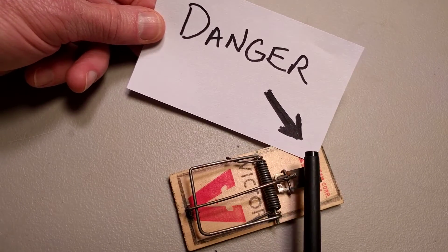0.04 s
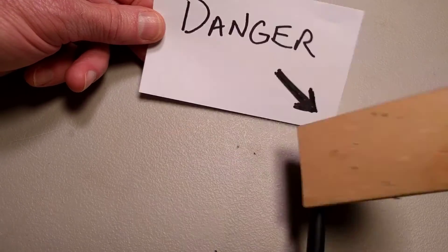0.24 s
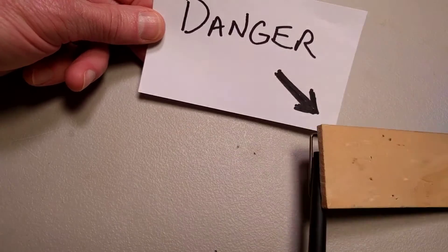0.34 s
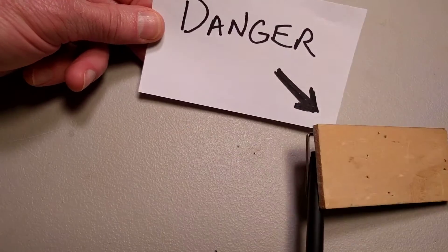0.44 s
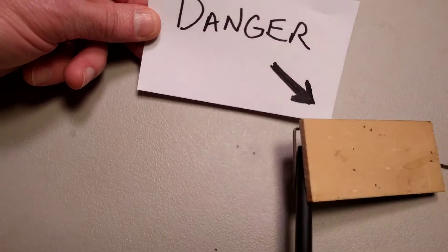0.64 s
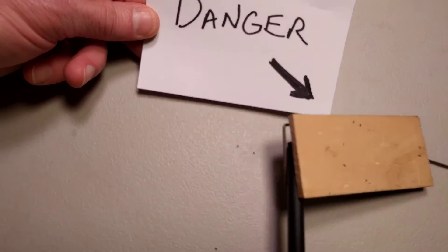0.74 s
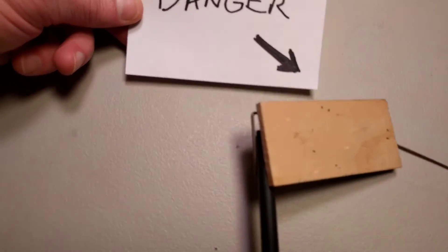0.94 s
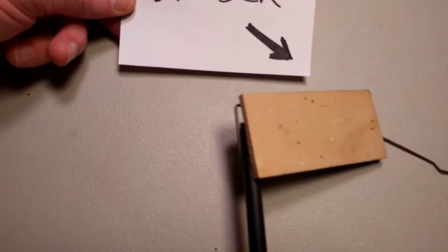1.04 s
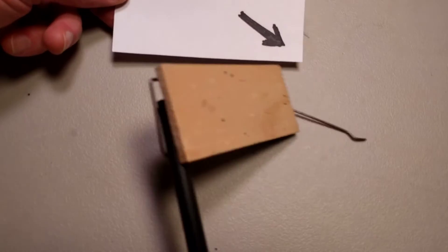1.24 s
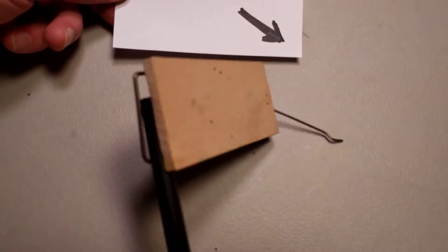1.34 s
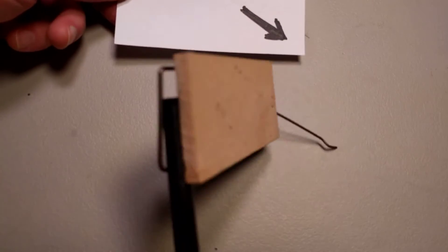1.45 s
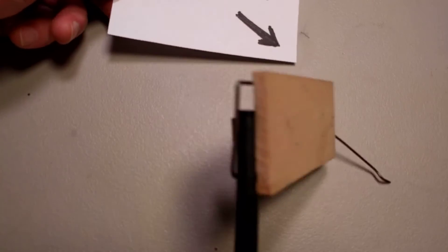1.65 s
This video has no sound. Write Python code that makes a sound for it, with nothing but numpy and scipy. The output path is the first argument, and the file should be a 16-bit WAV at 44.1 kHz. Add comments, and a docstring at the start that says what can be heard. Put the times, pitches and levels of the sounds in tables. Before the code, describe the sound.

After near silence, a piercing, slightly overloaded snap of a spring mousetrap, a second hard knock as it lands, small wiry rattles, then much softer wood scraping and creaking over a table in a quiet room, close up.

```python
"""Near-silence first; at 0.1 s low room noise and hiss come up at once. At 0.2 s a wooden mousetrap snaps
shut on a stick close to the microphone, jumps and clatters back onto a table. The board is then dragged
over the table top: it scrapes, sticks and slips in a short creak, and scrapes again. Noise bursts ring the
modes of board and wire; grainy noise makes the scrape; decaying sines ring the table; filtered noise is the hush."""
import sys
import numpy as np
from scipy import signal
from scipy.fft import rfft, irfft
from scipy.io import wavfile
from scipy.ndimage import uniform_filter1d

SR = 44100
rng = np.random.default_rng(int(sys.argv[2]) if len(sys.argv) > 2 else 0)


def field_ratio(decibels):
    """Amplitude ratio for a level in dB (20 dB per decade); scalars and array-likes work."""
    return 10 ** (np.asarray(decibels, dtype=float) / 20)


def digitize_waveform(pressure):
    """Quantize a signal to 16-bit integers and store it at the path in sys.argv[1].

    Rows of a 2-D input are taken as channels; values are limited to [-1, 1].
    """
    field = np.atleast_2d(pressure).T
    bounded = np.clip(field, -1, 1)
    quanta = np.round(bounded * 32767).astype(np.int16)
    wavfile.write(sys.argv[1], SR, quanta)


N = 74970  # samples, 1.7 s
LANDED_S = 0.76  # from here on the board rings as it does while dragged


def snap_and_clatter():
    """Separate blows of the trap: the snap, the jump, the landing and later knocks of the dragged board."""
    # blows: t/s, level/dB (loudest 2 ms), contact decay/ms, favoured f/Hz, spread to each side/octaves
    blows = [(0.128, -55, 3.1, 1500, 2.5), (0.2056, -28.5, 8.8, 301, 2.15),
             (0.2119, -20.5, 2.9, 6860, 0.42), (0.2143, -19, 4.6, 5000, 2.7), (0.2165, -3, 1.8, 5030, 0.86),
             (.219, 5, 4.9, 3470, 1.74), (0.2255, -6, 2, 3150, 0.94), (0.231, -9, 6.4, 6540, 0.34),
             (.2362, -17, 1.7, 7300, 0.18), (.249, -14, 2.7, 6000, 0.35), (.260, -15.5, 4.1, 6920, 0.45),
             (0.285, -22, 3.1, 5950, 0.37), (0.344, -12.5, 2.3, 7300, 0.15), (0.3888, -18, 2.7, 9000, 1.1),
             (0.389, -22, 1.1, 2280, 0.11), (0.408, 1, 1.43, 4480, 2.5), (0.4102, -3, 1.63, 5000, 1.82),
             (0.4095, -4.5, 2.1, 2905, 0.25), (0.4267, -30, 1.8, 4870, 1.8),
             (0.4644, -11.5, 0.95, 5800, 1.14), (0.4645, -20.5, 2.7, 2510, 0.14),
             (.468, -16, 1.8, 6050, 0.23), (0.5547, -13, 1.34, 6400, 0.6), (0.559, -18.5, 1.6, 5740, 0.25),
             (0.584, -20.5, 2.2, 6400, 0.22), (0.408, -12, 1.3, 600, 0.91), (.2205, -9, 7, 860, 1.26),
             (0.885, -38, 11, 5810, 0.52), (1.2165, -39.5, 3.7, 11500, 0.56), (1.234, -45, 13, 13000, 0.37),
             (1.2497, -37, 3., 8830, 0.069), (1.318, -34.5, 8, 5800, 0.77), (1.645, -36.5, 30, 7400, 0.15)]
    out = np.zeros(N)
    for s, db, contact_ms, hz, octaves in blows:
        add(out, s, blow(db, contact_ms, hz, octaves, s > LANDED_S))
    return out


def blow(db, contact_ms, favoured_hz, octaves, dragged):
    """A hard first touch and a dying burst of contact noise ring the modes near the favoured pitch most."""
    first_touch = 5.1  # times the rms of the contact noise at its start
    t = np.arange(3000) / SR
    push = rng.standard_normal(len(t)) - first_touch * (t == 0)
    push *= np.exp(-t * 1000 / contact_ms)
    favoured = band(push, favoured_hz / 2 ** octaves, favoured_hz * 2 ** octaves, order=2)
    rung = body(favoured, dragged)
    loudest = np.sqrt(uniform_filter1d(rung ** 2, 88).max())  # rms over 2 ms
    return field_ratio(db) * rung / loudest


def creak():
    """Stick and slip of the dragged board: each slip rings it, knocks it lower down and ticks."""
    # slips: t/s, level/dB (loudest 2 ms of the ring), favoured f/Hz
    slips = [(0.795, -44.5, 6000), (0.891, -36, 5950), (.977, -41, 5700), (1.0029, -39.5, 6000),
             (1.11, -38.5, 2500), (1.117, -41, 2400), (1.144, -36.5, 2520), (1.154, -30, 2570),
             (1.162, -26.5, 2400), (1.1744, -28.5, 2540), (1.1888, -25, 2500), (1.1999, -23, 3030),
             (1.2146, -29, 2400), (1.2313, -31, 3020), (1.2427, -37, 4300), (1.2497, -34.5, 5000),
             (1.2544, -32, 6540), (1.2616, -38.5, 5000), (1.287, -39.5, 4950), (1.6718, -27.5, 7100)]
    knock_db, tick_db = -11, -2.5  # against the ring of the slip
    out = np.zeros(N)
    for s, db, hz in slips:
        ring = blow(db, 0.75, hz, 0.27, True)
        knock = blow(db + knock_db, 2.5, 600, 0.63, True)
        tick = blow(db + tick_db, 0.13, 4300, 0.6, True)
        add(out, s, ring + knock + tick)
    return out


def body(push, dragged):
    """Passes a push through board and wire."""
    return signal.oaconvolve(push, body_taps(dragged))[:len(push)]


def body_taps(dragged):
    """Causal (minimum-phase) response whose power is the sum of the modes' powers."""
    # modes of board and wire: f/Hz, width/Hz, level while jumping/dB, level while dragged/dB
    modes = [(135, 96, 4, 2.5), (253.4, 186, 5, 7.5), (520, 145, 2.5, 6.5), (803, 137, 2, 2),
             (984, 48, 3.5, 4), (1550, 2200, -7.5, -16), (2221, 225, -2, -1.5), (2510, 95, 1, 0),
             (3203, 160, 0, -3.5), (3747, 200, 1.5, 0.5), (4127, 300, -4.5, 3.5), (4620, 330, -4, -4.5),
             (5294, 620, -0.5, -3.5), (5767, 240, 1, -1), (6400, 720, 1, -1), (6534, 130, -4, 2),
             (7300, 380, -1, -12), (7730, 260, -10, -13.5), (8700, 600, -15.5, -13.5),
             (9960, 1000, -15, -22), (13400, 1800, -15.5, -23), (14900, 520, -15, -22.5)]
    hz = abs(np.fft.fftfreq(8192, 1 / SR))
    power = sum(field_ratio(db[int(dragged)]) ** 2 / (1 + (2 * (hz - f) / width) ** 2) for f, width, *db in modes)
    log_gain = 0.5 * np.log(power)
    phase = -signal.hilbert(log_gain).imag
    return np.fft.ifft(np.exp(log_gain + 1j * phase)).real[:2048]


def rubbing():
    """Uneven grains of contact shake the modes, register by register, and the hollow under the dragged board."""
    # rubbing and rattling: t/s, low level/dB, middle level/dB, upper level/dB, treble level/dB
    levels = [(0.227, -18, -15.5, -5.5, -7.5), (0.268, -47, -47, -55, -26), (0.31, -39, -39, -28.5, -29),
              (0.35, -38, -38.5, -30.5, -30), (0.39, -51, -39.5, -37.5, -36.5),
              (0.429, -35, -35, -29, -26.5), (0.478, -42.5, -39.5, -51, -36),
              (0.574, -46.5, -39.5, -51, -39), (0.617, -48, -46, -37.5, -41.5),
              (0.679, -48, -54, -53.5, -63), (0.76, -65, -61.5, -73.5, -74),
              (0.809, -50.5, -53.5, -55, -60), (0.887, -45.5, -45, -47.5, -52),
              (0.93, -47.5, -53.5, -57, -61), (0.97, -46.5, -47.5, -53.5, -53.5),
              (1.05, -52, -57, -58.5, -62), (1.1, -46.5, -53, -58, -59), (1.15, -41, -42, -45, -48),
              (1.221, -36.5, -36, -42, -51.5), (1.275, -40, -46, -53, -48.5),
              (1.32, -48.5, -44.5, -42, -48), (1.41, -62, -52.5, -51.5, -55), (1.526, -68, -63, -65, -63.5),
              (1.563, -76.5, -83, -78.5, -79), (1.586, -56.5, -53, -54.5, -55),
              (1.62, -56.5, -45.5, -50, -49), (1.655, -50, -34.5, -38, -43), (1.7, -47.5, -42.5, -50, -32)]
    # edges of these four registers: f/Hz
    register_edges = [95, 1100, 3000, 4900, 16000]
    t = np.arange(N) / SR
    level_s, *register_db = np.transpose(levels)
    contact = contact_noise()
    rung = np.where(t < LANDED_S, body(contact, False), body(contact, True))
    out = hollow(contact, np.interp(t, level_s, register_db[0]))
    for low, high, db in zip(register_edges, register_edges[1:], register_db):
        out += evened(band(rung, low, high, order=3)) * field_ratio(np.interp(t, level_s, db))
    fade_in = np.clip((t - 0.215) / 0.0047, 0, 1)
    return out * fade_in


def contact_noise():
    """Random grains of uneven strength, each a short decaying burst of noise, over smooth noise."""
    grains_per_s, grain_db, smooth = 3100, 3.5, 0.55  # smooth: rms against that of the grains
    strength = field_ratio(grain_db * np.minimum(rng.exponential(1, N), 4))
    grains = strength * (rng.random(N) < grains_per_s / SR)
    grains = signal.lfilter([1], [1, -0.93], grains) * rng.standard_normal(N)
    return evened(grains) + smooth * rng.standard_normal(N)


def hollow(contact, low_db):
    """A hollow tone in the scrape, a gliding resonance of the contact, climbs as the board tips up."""
    # resonance of the hollow: t/s, f/Hz, level against the low register/dB
    glide = [(0.849, 474, -7), (1.08, 520, -7.5), (1.33, 799, -4), (1.58, 980, -16), (1.655, 1001, 2)]
    width_hz = 55
    t = np.arange(N) / SR
    s, hz, db = np.transpose(glide)
    turn = np.exp(2j * np.pi * np.cumsum(np.interp(t, s, hz)) / SR)
    # shifted down to 0 Hz, smoothed there and shifted back
    smoothed = signal.lfilter([1], [1, -np.exp(-np.pi * width_hz / SR)], contact / turn)
    tone = evened((turn * smoothed).real)
    return tone * field_ratio(np.interp(t, s, db) + low_db) * (t > LANDED_S)


def table_top(drag):
    """Thumps push the table top and leave it ringing; the drag shakes the same modes."""
    # pitches of the table top: f/Hz
    pitches = [57, 68, 84, 122, 145, 212]
    # ringing of each of these pitches: level/dB, t60/s
    ringing = [(-3, 1.1), (0, 1.1), (-5, .5), (1, .5), (-2, .3), (-4, .7)]
    # thumps into the table top: t/s, push level/dB, ringing level/dB
    thumps = [(0.228, -22.5, -48.5), (0.412, -27, -36.5), (1.309, -55, -49), (1.67, -61, -50)]
    push_ms, shake_db = 3.5, -9
    t, out = np.arange(SR) / SR, np.zeros(N)
    rings = sum(field_ratio(db - 60 * t / t60) * np.sin(2 * np.pi * hz * t)
                for hz, (db, t60) in zip(pitches, ringing))
    u = t * 1000 / push_ms
    push = np.e * u * (2 - u) * np.exp(-u)  # swings one way, then back
    for s, push_db, ring_db in thumps:
        add(out, s, field_ratio(push_db) * push + field_ratio(ring_db) * rings)
    # noise that follows the strength of the drag, over about 20 ms
    drag_power = uniform_filter1d(band(drag, 170, 1100, order=2) ** 2, 900)
    shake = rng.standard_normal(N) * np.sqrt(abs(drag_power))
    shaken = signal.fftconvolve(shake, rings / np.linalg.norm(rings))[:N]
    return band(out, 52, 1800, order=3) + field_ratio(shake_db) * shaken


def room(x):
    """Sparse echoes of random sign, each band dying at its own speed."""
    # reverberation of the place: f/Hz, t60/s
    decay = [(100, 0.16), (1000, 0.52), (5000, 0.67), (12000, 0.22)]
    taps = np.zeros(SR // 2)
    at = np.arange(150, len(taps) - 20, 20)
    taps[at + rng.integers(0, 20, len(at))] = rng.choice([-1., 1.], len(at))
    hz, t, z = signal.stft(taps, SR, nperseg=256)
    z = z * field_ratio(-60 * t / read(decay, hz)[:, None])
    tail = signal.istft(z, SR, nperseg=256)[1]
    return signal.fftconvolve(x, tail / np.linalg.norm(tail))[:N]


def hush():
    """Faint low room noise and microphone hiss: shaped noises that follow their own level curves."""
    # spectrum of the room noise: f/Hz, relative level per Hz/dB
    spectrum = [(15, -17.5), (60, -5.5), (150, -0.5), (300, -10.5), (600, -35.5), (1500, -55.5),
                (16000, -75.5)]
    # level of the room noise: t/s, level/dB
    noise_level = [(0, -81), (.098, -81), (.11, -57.5), (.2, -68), (.5, -69.5), (1.7, -72)]
    # level of the hiss: t/s, level/dB
    hiss_level = [(0, -88), (.099, -92), (.103, -71.5), (1.7, -67.5)]
    t = np.arange(N) / SR
    gain = field_ratio(read(spectrum, np.fft.rfftfreq(N, 1 / SR)))
    noise = irfft(rfft(rng.standard_normal(N)) * gain, N)
    hiss = signal.lfilter([1], [1, -0.8], rng.standard_normal(N))
    noise = evened(noise) * field_ratio(np.interp(t, *np.transpose(noise_level)))
    hiss = evened(hiss) * field_ratio(np.interp(t, *np.transpose(hiss_level)))
    return noise + hiss


def evened(x):
    """Scales to rms 1."""
    return x / np.sqrt(np.mean(x ** 2) + 1e-20)


def read(points, hz):
    """Looks up a table on a log-frequency axis."""
    f, value = np.transpose(points)
    return np.interp(np.log(hz + 1), np.log(f + 1), value)


def add(mix, s, sound):
    """Mixes a sound in at s seconds, in place."""
    part = mix[round(s * SR):][:len(sound)]
    part += sound[:len(part)]


def band(x, low_hz, high_hz, order):
    """Causal Butterworth band-pass."""
    edges = np.clip([low_hz, high_hz], 10, 21000)
    return signal.sosfilt(signal.butter(order, edges, "bandpass", fs=SR, output="sos"), x)


def scene():
    """Blows and slips with their echoes, over rubbing, table and hush."""
    room_db = -16  # echoes against the direct sound
    trap = snap_and_clatter() + creak()
    drag = rubbing()
    return (trap + field_ratio(room_db) * room(trap) + drag + table_top(drag) + hush())[None]


def low_pass(x):
    """Removes everything above the highest recorded frequency."""
    return signal.sosfilt(signal.butter(12, 16810, fs=SR, output="sos"), x)


def record(dry):
    """The microphone input overloads softly on the loudest blows; then a band limit and a small offset."""
    edge_hz, ceiling, knee, offset = 15750, 0.63, 5, -0.00036  # ceiling and offset: of full scale
    clipped = dry / (1 + abs(dry / ceiling) ** knee) ** (1 / knee)
    edge = signal.firwin(255, edge_hz, window=("kaiser", 4), fs=SR)[None]
    limited = signal.oaconvolve(clipped, edge, "same")
    return low_pass(limited + offset)


dry = scene()
out = record(dry)
digitize_waveform(out)
```